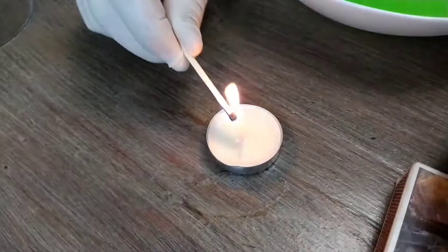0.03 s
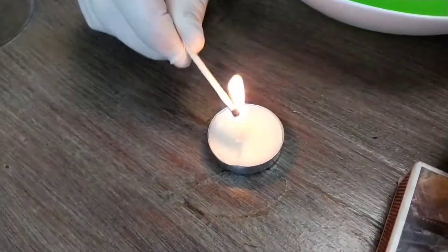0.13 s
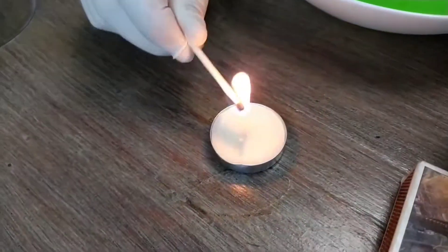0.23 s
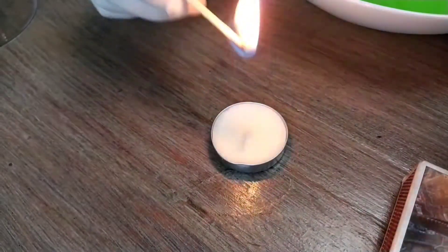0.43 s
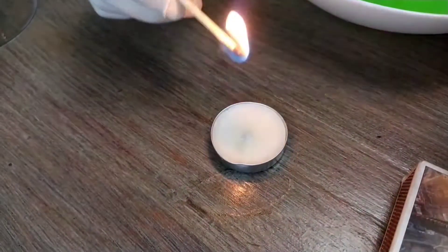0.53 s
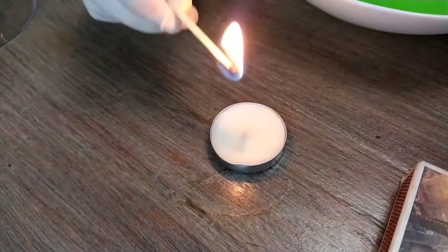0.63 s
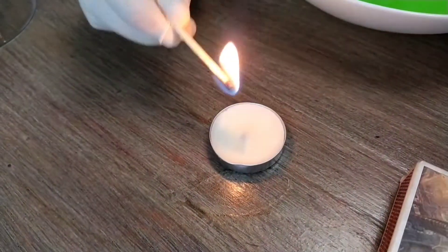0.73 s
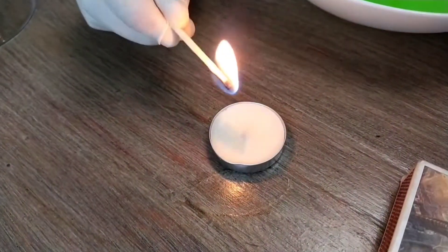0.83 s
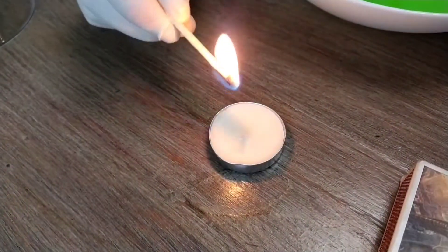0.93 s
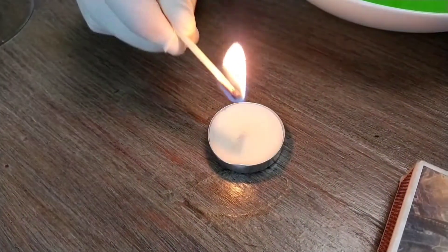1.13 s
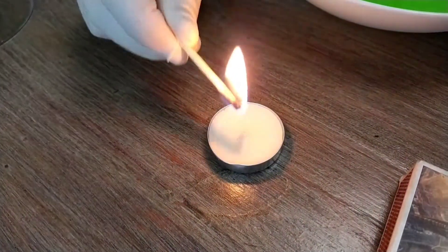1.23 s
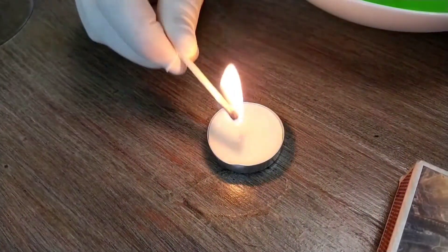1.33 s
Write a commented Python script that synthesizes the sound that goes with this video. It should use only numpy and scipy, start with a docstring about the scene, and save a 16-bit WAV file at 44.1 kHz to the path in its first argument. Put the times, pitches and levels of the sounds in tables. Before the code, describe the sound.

A light object taps sharply on a wooden table at about 0.1 seconds, with a tiny scuff, a soft thud and a brief chatter. A sleeve rustles faintly, swelling around 0.4 to 0.6 seconds and fading by 1 second. Small dry ticks come from handling a match, the clearest at 0.6 and 1.3 seconds. The room is small and quiet, with a faint low rumble.

```python
"""Lighting a tea light

A tea light is lit with a match at a wooden table in a small, quiet room; we hear the handling.
Something light scuffs over the table top in tiny slips, knocks on it sharply and chatters to rest,
ringing the object and the wood. Soft pushes thud through the table. A sleeve rustles as the match
is lifted, and the handling makes a few small dry ticks."""
import sys
import numpy as np
from scipy import signal
from scipy.fft import rfft, irfft, next_fast_len
from scipy.io import wavfile

SR = 44100
rng = np.random.default_rng(int(sys.argv[2]) if len(sys.argv) > 2 else 0)


def file_out(sig):
    """Save sig as 16-bit WAV at sys.argv[1]."""
    # one column per channel
    cols = np.atleast_2d(sig).T
    # limit, then scale
    lim = np.clip(cols, -1, 1)
    pcm = np.round(lim * 32767).astype(np.int16)
    wavfile.write(sys.argv[1], SR, pcm)


N = 61739
T = np.arange(N) / SR
BACKGROUND_WIDTH_DB, HANDLING_WIDTH_DB, SNAP_WIDTH_DB = -54, -8, -29.5  # side against mid


def from_db(db):
    """Decibels to gain."""
    return 10 ** (np.asarray(db) / 20)


def fader(points):
    """Turn (seconds, dB) points into a gain at every sample."""
    return from_db(np.interp(T, *np.transpose(points)))


def at_hz(points, hz):
    """Read a curve along a log frequency axis."""
    frequencies, values = np.transpose(points)
    return np.interp(np.log(hz), np.log(frequencies), values)


def decay(age, t60):
    """Silent before age 0, then falling 60 dB every t60 seconds."""
    return (age >= 0) * np.exp(-np.log(1000) * np.maximum(age, 0) / t60)


def fade_in(age, attack_s):
    """A straight rise from silence to full level."""
    return np.clip(age / attack_s, 0, 1)


def clicks(starts, db):
    """Single clicks at the given times and levels."""
    track = np.zeros(N)
    samples = np.clip(np.atleast_1d(starts) * SR, 0, N - 1).astype(int)
    np.add.at(track, samples, from_db(db))
    return track


def ring(x, hz, t60):
    """A resonator: a unit click sets a sine of height 1 ringing."""
    radius, angle = np.exp(-np.log(1000) / (t60 * SR)), 2 * np.pi * hz / SR
    feedback = [1, -2 * radius * np.cos(angle), radius * radius]
    return signal.lfilter([0, radius * np.sin(angle)], feedback, x + 1e-18)


def butter(x, hz, kind, order=2):
    """Butterworth filter."""
    return signal.sosfilt(signal.butter(order, hz, kind, fs=SR, output="sos"), x)


def noise(colour, width_db):
    """Coloured stereo noise of rms 1."""
    size = next_fast_len(N)
    hz = np.maximum(np.arange(size // 2 + 1) * SR / size, 1)
    white = rfft(rng.standard_normal((2, size)))
    mid, side = irfft(white * from_db(at_hz(colour, hz)), size)[:, :N]
    stereo = mid + from_db(width_db) * side * [[1], [-1]]
    return stereo / np.sqrt(np.mean(stereo ** 2))


# The dark bed of the room. Each row: frequency in Hz, relative level in dB.
ROOM_TONE_COLOUR = [(10, -25), (25, -7), (45, 2), (130, 0.5), (200, -3.5), (320, -1), (500, -9.5),
                    (900, -13), (1700, -15), (2800, -18), (7000, -24.5), (16000, -27.5)]


def room_tone(level_db=-62.5):
    """A faint, steady rumble with a trace of hiss."""
    return from_db(level_db) * noise(ROOM_TONE_COLOUR, BACKGROUND_WIDTH_DB)


# The soft tone of the cloth. Each row: frequency in Hz, relative level in dB.
SLEEVE_COLOUR = [(40, -22), (150, -3.5), (280, 0), (480, -1.5), (700, -5), (950, -9.5), (1650, -10.5),
                 (2300, -19), (4500, -27), (8000, -33), (16000, -36)]
# The swells of the rustle. Each row: time in seconds, level in dB.
SLEEVE_LEVEL = [(0, -56), (.1, -50.5), (.25, -51.5), (.32, -52.5), (.395, -47), (.42, -49.5), (.45, -45),
                (.51, -49.5), (.54, -47), (.58, -51), (.655, -53.5), (.71, -55.5), (.755, -53.5),
                (.81, -57.5), (.87, -54), (.91, -56), (.94, -61.5), (1.05, -62), (1.2, -70), (1.4, -67)]
# A treble ride on top of those swells. Each row: time in seconds, boost or cut in dB.
SLEEVE_TREBLE = [(0, 2.5), (.3, 0), (.55, -4), (.66, -1), (.8, 6.5), (1.0, -3.5), (1.4, -0.5)]


def sleeve():
    """Cloth rustles softly as the arm lifts and lowers the match, brighter on the way down."""
    cloth = noise(SLEEVE_COLOUR, BACKGROUND_WIDTH_DB)
    dull = butter(cloth, hz=930, kind="lowpass", order=1)
    treble = cloth - dull
    return fader(SLEEVE_LEVEL) * (dull + fader(SLEEVE_TREBLE) * treble)


# The ring of object and table. Each row: frequency in Hz, level in dB, time to fall 60 dB in seconds.
BODY_MODES = [(295, -23, 0.2), (403.6, -0.5, 0.039), (671, -18, 0.067), (763, -6.5, 0.021),
              (1203, -6, 0.03), (1346, -4.5, 0.024), (1653, 1, 0.016), (1740, -5.5, 0.03), (1853, -3, .028),
              (3470, -9, 0.01), (4060, -7.5, 0.013), (5140, -17.5, 0.029), (5520, -6, 0.0051),
              (5750, -15, 0.01), (7925, -15, 0.0044), (11130, -20.5, 0.014)]


def wooden_body(force, pan_db=0.5):
    """Object and table top ring under a force; bending waves bring the high modes first."""
    travel_at_1khz_s = 0.000655
    response = 0
    for k, (hz, db, t60) in enumerate(BODY_MODES):
        age = T[:N // 4] - travel_at_1khz_s * np.sqrt(1000 / hz)
        lean_db = pan_db * (-1) ** (k // 2) * np.array([[1], [-1]])  # two modes left, two right
        polarity = (-1) ** k
        response += polarity * from_db(db + lean_db) * np.sin(2 * np.pi * hz * age) * decay(age, t60)
    ringing = signal.fftconvolve(force[None], response, axes=1)[:, :N]
    return butter(ringing, hz=202, kind="highpass")


# Strokes over the wood. Each row: start in seconds, length in seconds, ring level in dB, hiss in dB.
SCUFFS = [(0.025, 0.024, -47, -84), (0.055, 0.028, -46.5, -58), (0.107, 0.04, -37, -43.5)]
# The tone of the friction hiss. Each row: frequency in Hz, relative level in dB.
HISS_COLOUR = [(200, 14), (600, 11.5), (1800, 6.5), (2400, 9), (4000, 2), (8000, 2), (10000, -11),
               (13000, -2), (16000, -25)]


def scuffs(slips_per_s=2500, slip_spread_db=4.5):
    """Sliding is a dense rain of tiny slips into the wooden body, with friction hiss."""
    slips = (rng.random(N) < slips_per_s / SR) * rng.choice([-1, 1], N)
    slips = slips * from_db(-slip_spread_db * np.minimum(rng.exponential(1, N), 4))
    slips = butter(slips, hz=[915, 2800], kind="bandpass")
    pressure = hiss_gain = 0
    for start, length, ring_db, hiss_db in SCUFFS:
        release = decay(np.maximum(T - start - length, 0), t60=0.013)
        stroke = fade_in(T - start, attack_s=0.009) * release
        pressure += from_db(ring_db) * stroke
        hiss_gain += from_db(hiss_db) * stroke
    scrape = wooden_body(slips * pressure) / np.std(wooden_body(slips))
    return scrape + hiss_gain * noise(HISS_COLOUR, HANDLING_WIDTH_DB)


# The knock and its chatter. Each row: start in seconds, hit strength in dB, crack level in dB.
KNOCK_CONTACTS = [(0.0642, -43.5, -59), (0.0823, -59, -56), (0.0924, -29.5, -74), (0.094, -38.5, -39),
                  (0.1028, -27, -33.5), (0.1042, -16.5, -34.5), (0.1126, -29.5, -56), (0.1309, -35, -38.5),
                  (0.1343, -36, -48), (0.1415, -43.5, -55)]
# The bite of the crack. Each row: frequency in Hz, relative level in dB.
CRACK_COLOUR = [(200, -5), (1500, 11.5), (2100, -8), (2800, -0.5), (3800, 9.5), (4600, -2), (5700, 5),
                (7000, 0), (9500, -6.5), (12000, -5.5), (16000, -14)]


def knock():
    """A quick run of contacts, each with a brief crack, rings the wooden body."""
    hits = crack_gain = 0
    for start, hit_db, crack_db in KNOCK_CONTACTS:
        age = T - start
        hits += clicks(start, hit_db)
        crack_gain += from_db(crack_db) * fade_in(age, attack_s=0.00085) * decay(age, t60=0.04)
    return wooden_body(hits) + crack_gain * noise(CRACK_COLOUR, HANDLING_WIDTH_DB)


# Soft weight on the table. Each row: start in seconds, push strength in dB.
THUDS = [(0.08, -41.5), (0.103, -38.5), (0.471, -48.5), (0.609, -51), (0.837, -51.5)]


def thuds():
    """Soft pushes move the whole table at its lowest mode."""
    pushes = clicks(*np.transpose(THUDS))
    return butter(ring(pushes, hz=83.6, t60=0.1), hz=174, kind="lowpass")


# Small dry ticks. Each row: start in seconds, snap level in dB, the low ring's pitch in Hz, drive in dB
# and delay in seconds, then the upper ring's pitch in Hz, drive in dB and time to fall 60 dB in seconds.
TICKS = [(.4975, -52, 500, -58, 0.0017, 1600, -46, 0.0055),
         (0.6075, -40, 508, -28.5, 0.00189, 1600, -41, 0.0076),
         (0.6853, -53, 497, -76, 0.00092, 1700, -62, 0.0054),
         (.8690, -64, 475, -39, 0.00067, 1440, -45, 0.019),
         (1.2870, -39, 550, -24, 0.00023, 1520, -25, 0.0044)]
# The bright edge of a tick. Each row: frequency in Hz, relative level in dB.
SNAP_COLOUR = [(1000, 5), (3000, 4.5), (5500, 6), (8000, 4), (10000, -8), (13000, 0.5), (16000, -19)]


def ticks(low_ring_stretch=1.65):
    """Each handling tick is a bright snap and two heavily damped rings, the lower lasting longer."""
    rings = snap_gain = 0
    for start, snap_db, low_hz, low_db, low_delay, upper_hz, upper_db, upper_t60 in TICKS:
        snap_gain += from_db(snap_db) * decay(T - start, t60=0.0084)
        low = ring(clicks(start + low_delay, low_db), low_hz, upper_t60 * low_ring_stretch)
        upper = ring(clicks(start, upper_db), upper_hz, upper_t60)
        rings += low - upper
    rings = butter(rings, hz=228, kind="highpass")
    rings = butter(rings, hz=3000, kind="lowpass", order=1)
    return rings + snap_gain * noise(SNAP_COLOUR, SNAP_WIDTH_DB)


# How long the room hangs on. Each row: frequency in Hz, time to fall 60 dB in seconds.
REVERB_T60 = [(100, 0.38), (400, 0.27), (1600, 0.42), (4000, 0.35), (8000, 0.27), (16000, .16)]
# The tone of the tail. Each row: frequency in Hz, level in dB against the direct sound.
REVERB_COLOUR = [(80, -11), (280, 1), (420, -18), (700, -9), (1500, -11.5), (3500, -10.5), (7000, -9.5),
                 (16000, -6)]


def room_reverb(direct, predelay_s=0.0023):
    """The small room adds a short diffuse tail that dies soonest in the high treble."""
    age = T[:N // 3] - predelay_s
    edges_hz = np.geomspace(50, 18000, 15)
    response = 0
    for low, high in zip(edges_hz, edges_hz[1:]):
        hz = np.sqrt(low * high)
        tail = fade_in(age, attack_s=0.0051) * decay(age, at_hz(REVERB_T60, hz))
        band = butter(rng.standard_normal(len(age)), [low, high], "bandpass")
        response += from_db(at_hz(REVERB_COLOUR, hz)) * band * tail / np.sqrt(np.sum(tail ** 2))
    return signal.fftconvolve(direct.mean(axis=0), response)[:N]


def scene():
    """Handling sounds straight ahead, their reverb, the sleeve and the room tone."""
    handling = knock() + scuffs() + thuds() + ticks()
    return handling + room_reverb(handling) + sleeve() + room_tone()


def record(dry):
    """A steep low-pass takes off the very top."""
    cutoff_hz = 16000
    return signal.sosfilt(signal.ellip(10, .1, 70, cutoff_hz, fs=SR, output="sos"), dry)


dry = scene()
out = record(dry)
file_out(out)
```